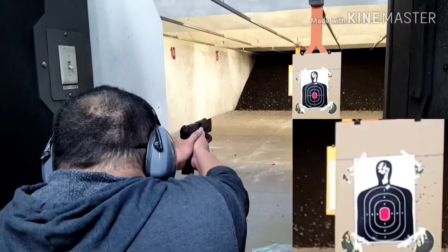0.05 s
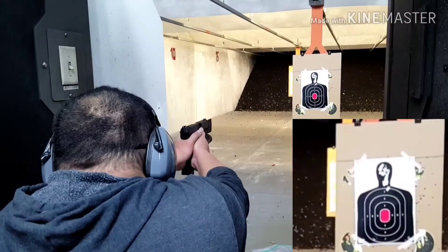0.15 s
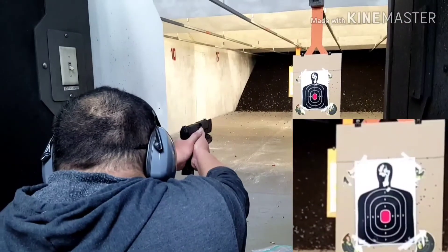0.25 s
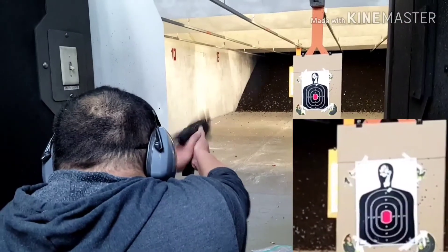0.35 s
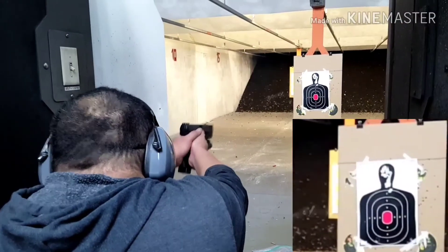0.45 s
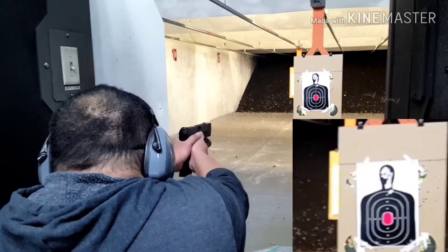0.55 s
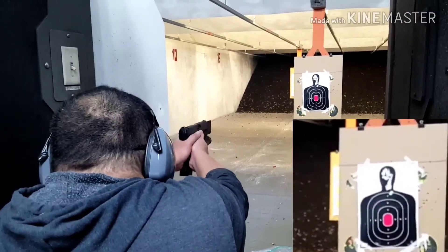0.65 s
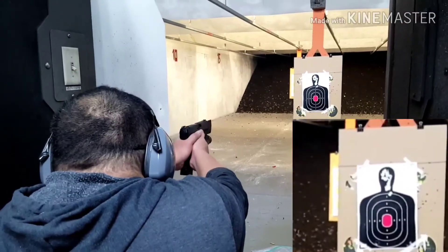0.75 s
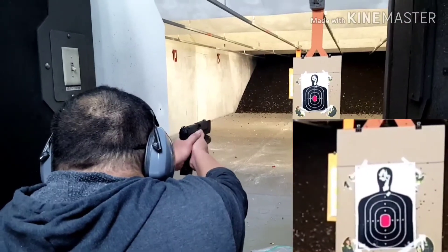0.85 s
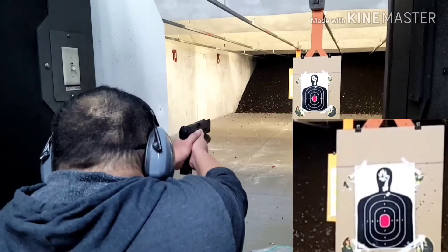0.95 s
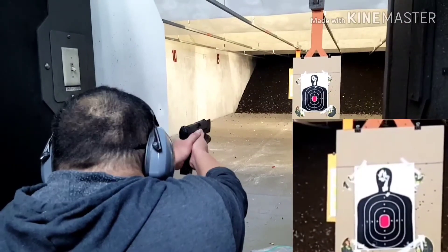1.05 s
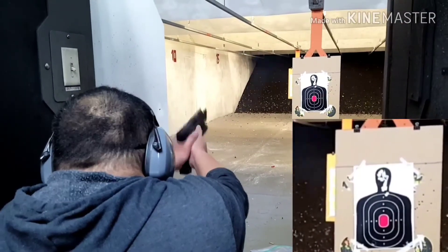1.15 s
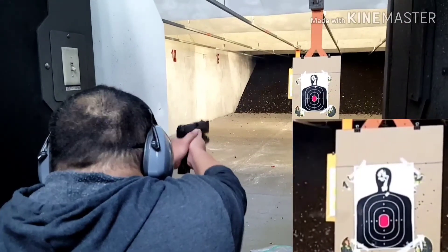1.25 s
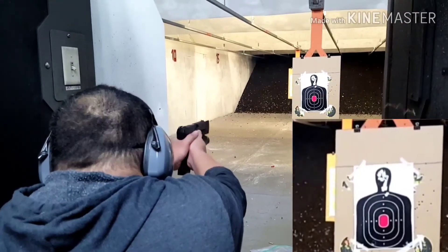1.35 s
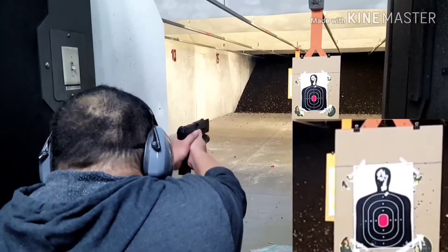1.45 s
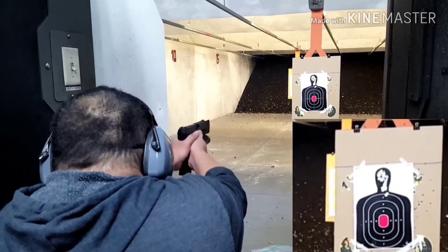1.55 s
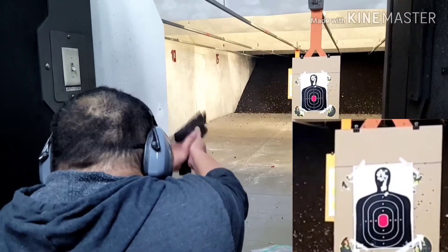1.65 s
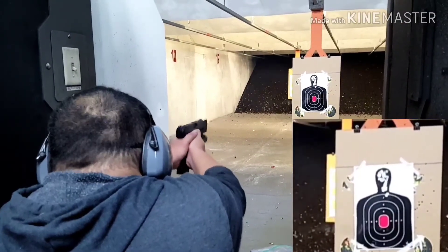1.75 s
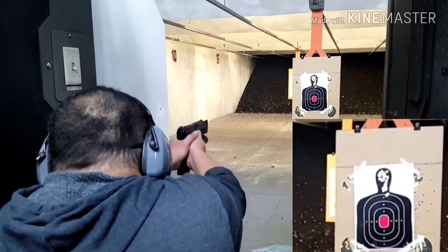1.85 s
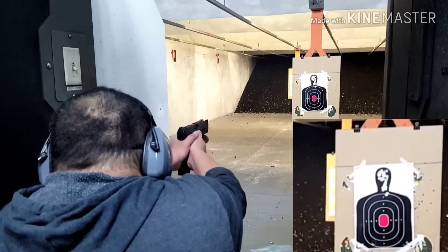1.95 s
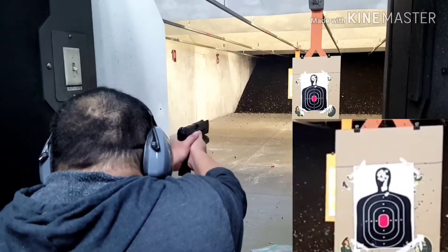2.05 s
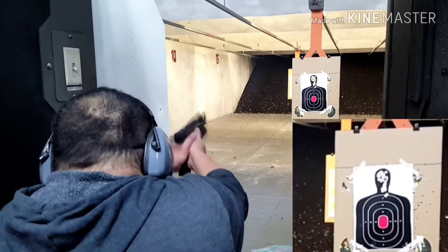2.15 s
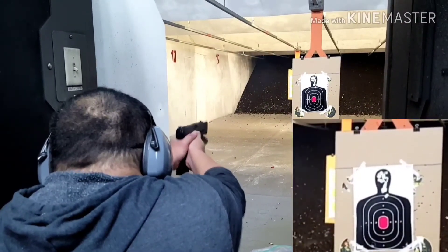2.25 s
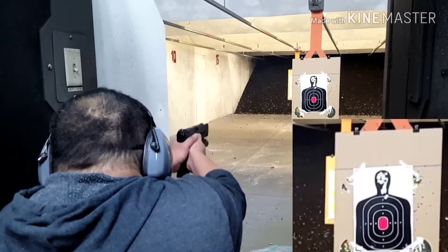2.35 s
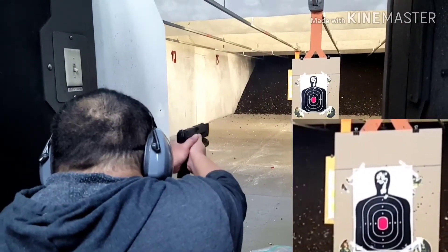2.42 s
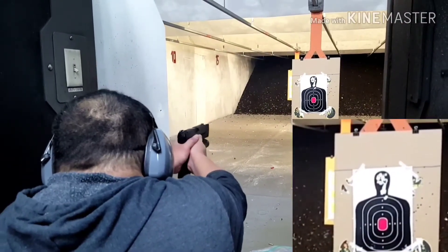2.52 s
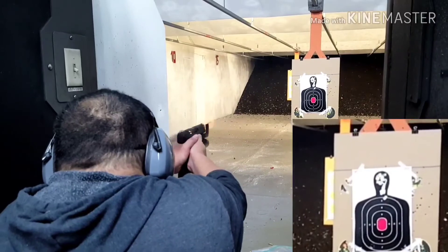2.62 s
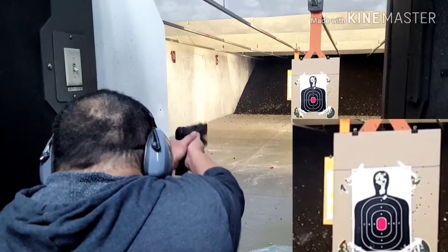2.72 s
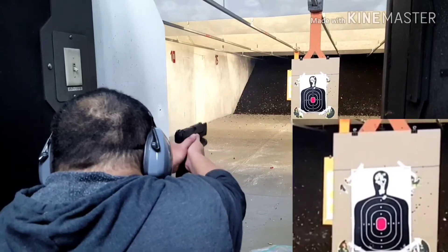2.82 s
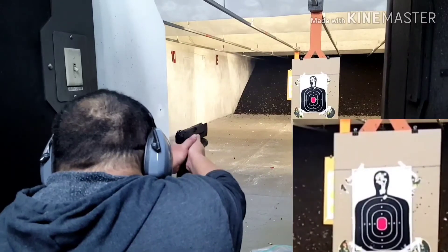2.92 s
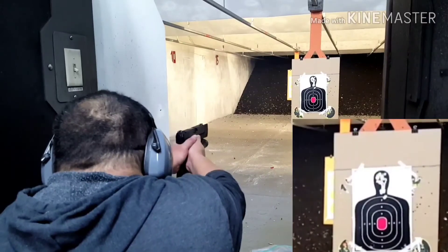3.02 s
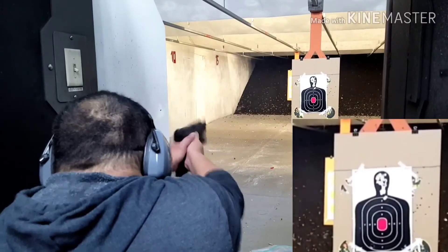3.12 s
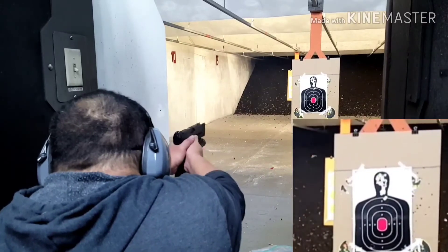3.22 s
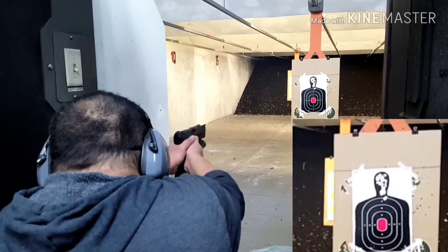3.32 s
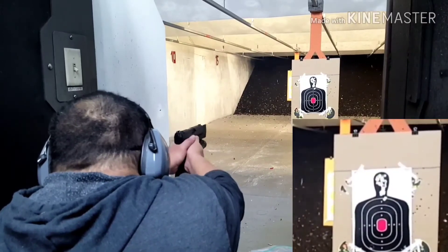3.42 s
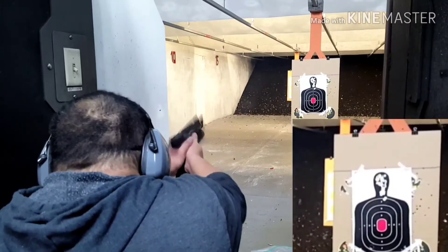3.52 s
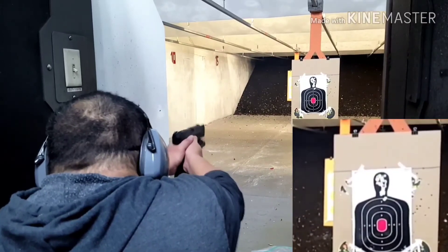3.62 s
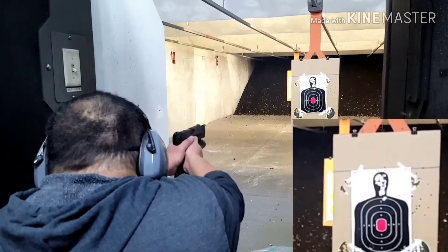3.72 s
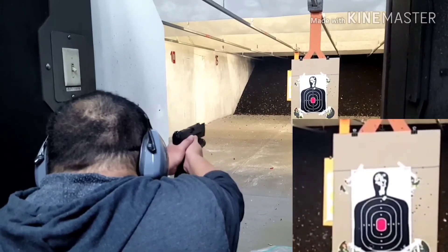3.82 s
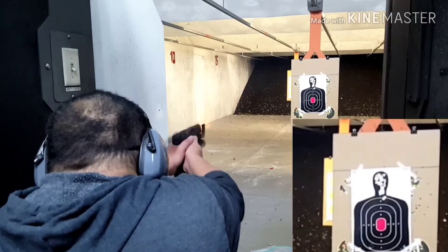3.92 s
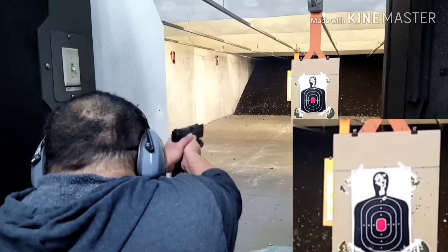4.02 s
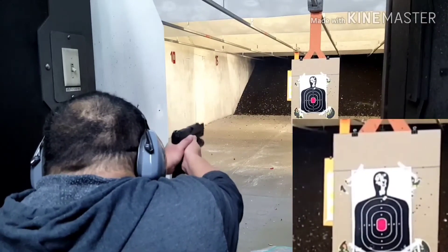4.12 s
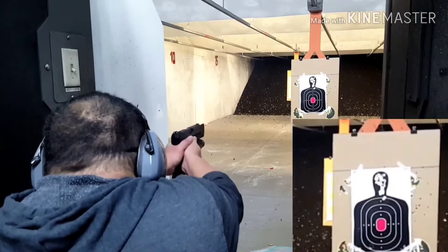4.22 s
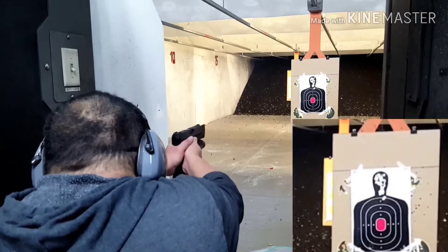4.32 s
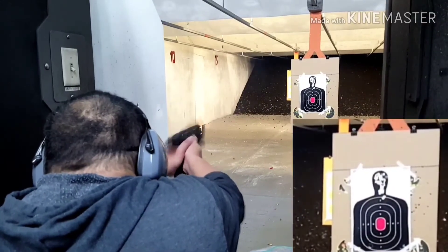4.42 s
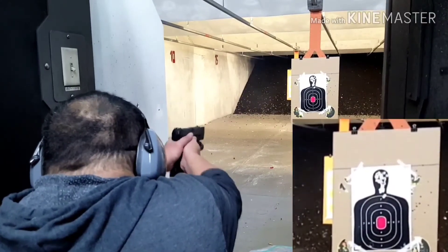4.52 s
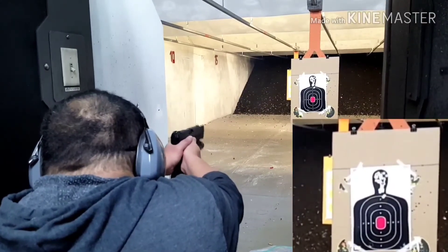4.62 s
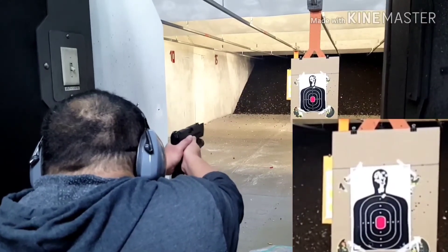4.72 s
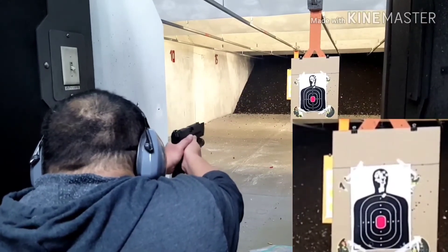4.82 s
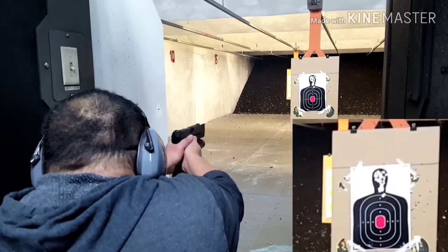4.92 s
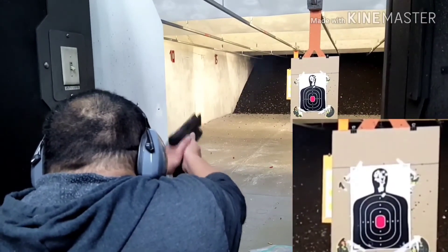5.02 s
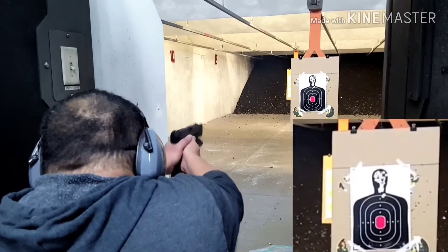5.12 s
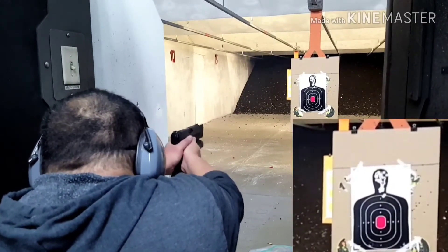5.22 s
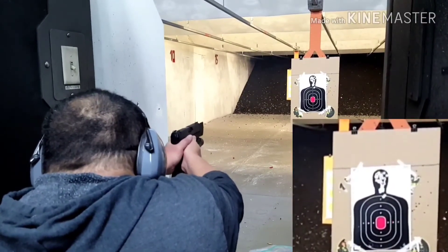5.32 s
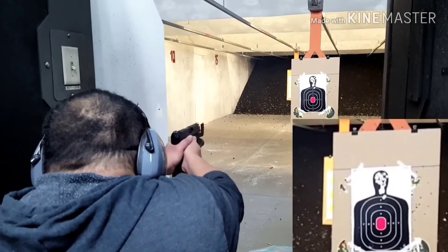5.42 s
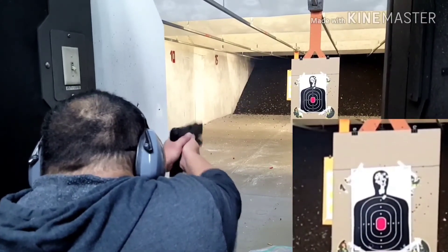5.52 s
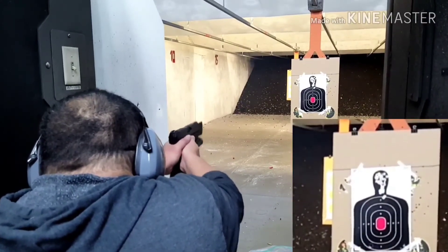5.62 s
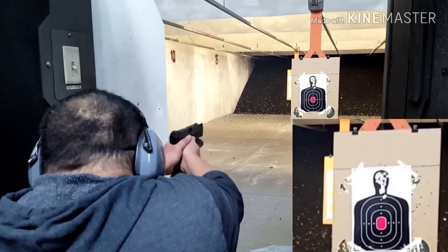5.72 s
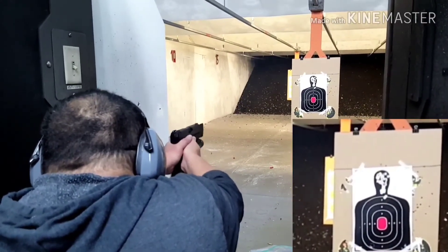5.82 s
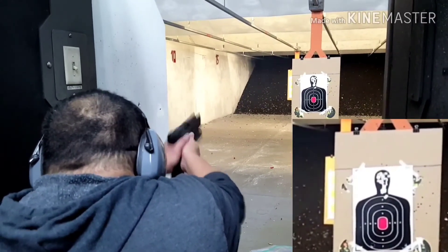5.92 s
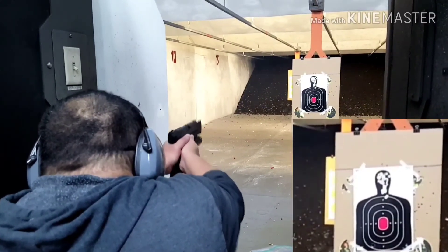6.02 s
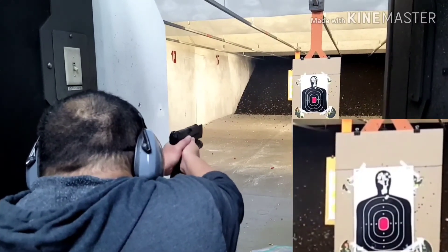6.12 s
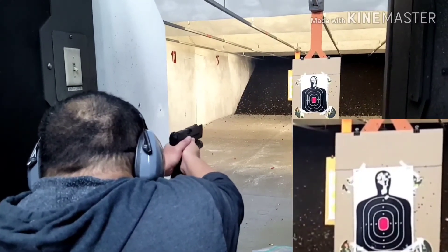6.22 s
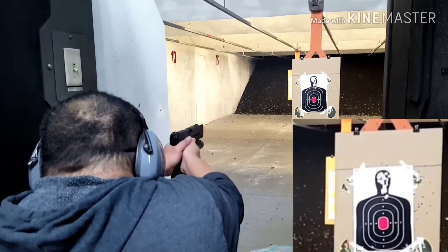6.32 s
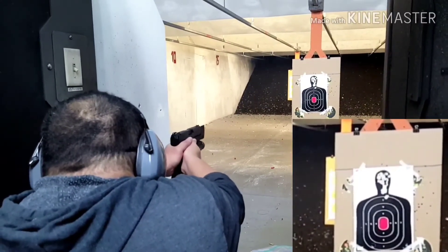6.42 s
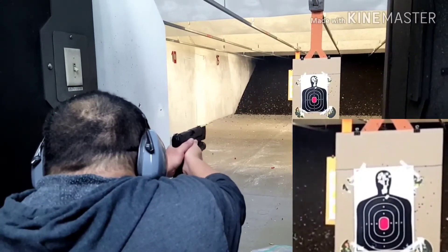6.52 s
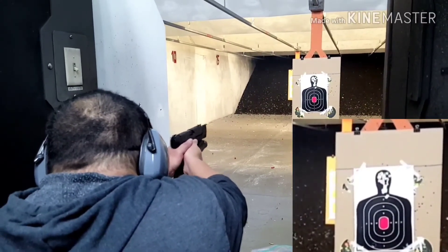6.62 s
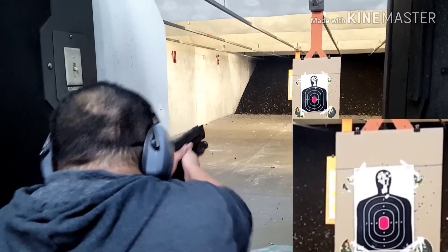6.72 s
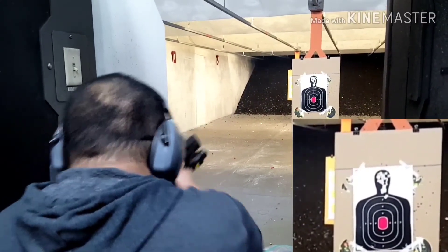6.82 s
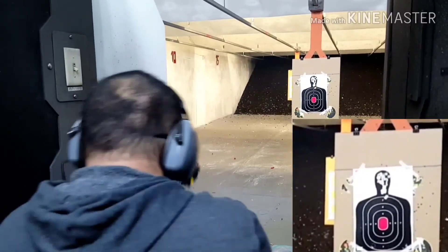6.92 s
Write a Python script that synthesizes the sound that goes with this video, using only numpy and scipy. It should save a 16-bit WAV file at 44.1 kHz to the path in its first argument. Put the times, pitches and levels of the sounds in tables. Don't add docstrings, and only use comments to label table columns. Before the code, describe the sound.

A pistol fires twelve evenly spaced, harshly distorted shots in an echoing concrete indoor range, with brass cases tinkling and steel clacks at the end.

```python
import sys
import numpy as np
from scipy import signal
from scipy.fft import rfft, irfft
from scipy.io import wavfile
from scipy.ndimage import uniform_filter1d

SR = 44100
rng = np.random.default_rng(int(sys.argv[2]) if len(sys.argv) > 2 else 0)


def output_pcm(signal):
    pcm = np.clip(np.atleast_2d(signal).T, -1, 1) * 32767
    wavfile.write(sys.argv[1], SR, np.round(pcm).astype(np.int16))


def gain_from_decibels(decibels):
    exponent = np.asarray(decibels, float) / 20
    return 10 ** exponent


N = 306936

# f/Hz, level/dB per Hz
VENT_SPECTRUM = [(25, -31.5), (60, -12), (110, -14), (200, -11.5), (400, -18), (650, -22), (900, -17.5),
                 (1400, -21.5), (2200, -25), (3500, -37), (5000, -45.5), (8000, -51), (11000, -53),
                 (15000, -75)]
# f/Hz, level/dB
FAN_TONES = [(107.7, -46), (242.2, -50), (425.3, -46), (495.3, -49.5), (888.2, -46), (3418, -59.5),
             (3585, -60), (4500, -62.5)]
# t/s, charge level/dB
SHOTS = [(.458, 1), (1.2378, 0.5), (1.7447, 1), (2.2489, 1), (2.75, 1), (3.177, 1), (3.6198, 1),
         (4.0497, 1), (4.5401, 0.5), (5.1115, 1), (5.566, 1), (6.0014, 1)]
# f/Hz, level/dB per Hz
HALL_SPECTRUM = [(35, -78), (60, -55), (120, -25), (200, -15.5), (320, -10.5), (430, -7.5), (560, -8),
                 (900, -12), (1400, -12.5), (2200, -17.5), (3500, -28), (5800, -36.5), (9500, -47.5),
                 (15500, -62)]
# f/Hz, T60/s
HALL_T60 = [(60, 0.65), (150, 1.5), (400, 0.85), (750, 0.84), (1400, 0.98), (2500, 0.97), (5000, 0.71),
            (12000, 0.46)]
# f/Hz, level/dB, T60/s
HALL_MODES = [(894.7, -27.5, 1.6), (563.7, -27.5, .9), (440, -26.5, .8), (386, -31, 0.93), (641, -34, 1.1),
              (1183, -34.5, 0.51), (1391, -29, .9), (1703, -31.5, .8), (2182, -37.5, 0.96)]
# f/Hz, correlation/0-1
LIKENESS = [(60, 0.99), (250, 1), (400, .88), (550, 1), (800, 0.6), (1200, .1), (9000, .05)]
# t after shot/s, peak level/dB, fade per slap/dB, f/Hz, length/s
FLUTTERS = [
    (0.099, -10.5, -1, 440, .012),
    (.175, -8, -2, 444.7, .013),
    (.245, -13, -5, 376, .014),
    (.32, -8.5, -9, 450, 0.0042),
    (.376, -17.5, -16, 405, 0.0061),
]
FLUTTER_SLAPS = (2, 3, 3, 2, 2)
# t/s, peak level/dB, ring level re click/dB
CASES = [(.711, -30.5, -20.5), (.971, -51, -16), (.984, -47, -24), (1.494, -26.5, -10.5),
         (1.984, -37.5, -30), (2.206, -48, -20), (2.5466, -32, -7.5), (2.639, -58, -5), (2.7217, -38, -2),
         (3.113, -39, -13), (3.445, -36, -16), (3.842, -43, 3), (3.929, -44, -7), (3.985, -46, -7),
         (4.29, -23.5, -15), (4.79, -37, -3), (5.464, -43, 2), (5.495, -47, 3), (5.5164, -50, -2),
         (5.85, -55, -14), (6.3, -58, -13.5), (6.446, -58, 1), (6.478, -61, -5.5), (6.4933, -29, -16),
         (6.57, -53, -10), (6.67, -67, 3), (6.72, -70.5, 5), (6.79, -57, -5), (6.836, -61, -5.5)]
# t/s, peak level/dB, f/Hz
CLACKS = [
    (5.83, -15, 2620),
    (6.267, -16, 2570),
    (6.7694, -57, 4000),
    (6.8187, -52, 3570),
    (6.8573, -58, 3500),
    (6.9072, -46, 3430),
]

BANDS_HZ = 40 * 2 ** np.arange(0, 8.7, 1 / 3)
HALL_SIZE = 2 ** 16
TAIL_AGE_S = 0.25
VENT_DB, VENT_DUCK_DB, RECOVER_S, RECOVER_DB_PER_S = -34.5, -11.5, 0.83, 39
HALL_DB, EARLY_DB, EARLY_S = -14, 16, 0.22
SAG_DB, LATE_DB, LATE_S = -1.66, 2, 0.52
BACKSTOP_S, BACKSTOP_DB, BACKSTOP_WIDTH_S = 0.306, 2, 0.023
FLUTTER_S = 0.022
THUD_S, THUD_DB, THUD_HZ, THUD_LENGTH_S = 0.375, -36, 159.4, 0.022
LANDS_S, LANDS_PAN_DB, ROLLS_PAN_DB = 0.29, -4.5, 3
CASE_HZ, CASE_SPREAD_HZ, CASE_T60_S, CASE_WOBBLE = 9920, 35, 0.31, 0.0079
LAG_S = 0.00022
SATURATION_DB = -4.5
WRAP_START, WRAP_SAG, WRAP_BEND, WRAP_ENDS_S = 1.033, 0.2, 3.5, 0.205
WRAP_PAUSE_S, WRAP_PAUSE_WIDTH_S, WRAP_PAUSE = 0.178, 0.006, 0.091
FIRST_DB, DUCK_DB, DUCK_S, PUSH_DB = 5, -5.5, 0.089, 2.01
AHEAD_DB, AHEAD_S = -1.5, 0.01


def on_log(hz, table):
    table = np.array(table)
    return np.interp(np.log(hz), np.log(table[:, 0]), table[:, 1])


def add(out, x, s):
    i = int(s * SR)
    out[:, i:i + x.shape[1]] += x[:, :out.shape[1] - i]


def bump(t, s, width):
    return np.exp(-((t - s) / width) ** 2)


def rms_db(x, db, part=slice(None)):
    return x * gain_from_decibels(db) / np.sqrt(np.mean(x[:, part] ** 2))


def since_shot(t):
    starts = np.array(SHOTS)[:, 0]
    latest = np.maximum(np.searchsorted(starts, t) - 1, 0)
    return np.where(t < starts[0], 1, t - starts[latest])


def pair(size, hz, width):
    f = np.arange(size // 2 + 1) * SR / size
    low = int(hz * np.exp(-3 * width) * size / SR)
    high = int(hz * np.exp(3 * width) * size / SR) + 2
    near = slice(low, high)
    phase = 2 * np.pi * rng.random((2, len(f)))[:, near]
    fall = (np.log(f[near] / hz + 1e-9) / width) ** 2
    spectrum = np.zeros((2, len(f)), complex)
    spectrum[:, near] = np.exp(1j * phase - fall)
    mid, side = irfft(spectrum, size)
    like = np.clip(on_log(hz, LIKENESS), 0, 1)
    return np.sqrt(1 + like) * mid + np.sqrt(1 - like) * side * np.array([[1], [-1]])


def ventilation():
    air = sum(pair(HALL_SIZE, hz, 0.22) * gain_from_decibels(on_log(hz, VENT_SPECTRUM)) for hz in BANDS_HZ)
    duct = rms_db(air, 0)
    for hz, db in FAN_TONES:
        duct = duct + rms_db(pair(HALL_SIZE, hz, min(55 / hz, 0.025)), db + 36.0)
    duct = np.take(duct, np.arange(N), axis=1, mode="wrap")
    shooting = np.arange(N) > SHOTS[0][0] * SR
    hum = signal.filtfilt(*signal.butter(N=2, Wn=600, fs=SR), duct)
    duct = duct - 0.55 * shooting * hum
    t = np.arange(N) / SR
    recovery_db = RECOVER_DB_PER_S * np.maximum(since_shot(t) - RECOVER_S, 0)
    duck_db = np.minimum(VENT_DUCK_DB + recovery_db, 0) * (t > SHOTS[0][0])
    return duct * gain_from_decibels(VENT_DB + duck_db)


def swell_db(t):
    early = EARLY_DB * np.clip(1 - t / EARLY_S, 0, 1)
    backstop = BACKSTOP_DB * bump(t, BACKSTOP_S, BACKSTOP_WIDTH_S)
    late = LATE_DB / (1 + np.exp((LATE_S - t) / 0.013))
    return early + SAG_DB + backstop + late


def hall(size):
    t = np.arange(size) / SR

    def build(hz):
        return 1 - np.exp(-(t + 0.0052) * hz / 45)

    response = np.zeros((2, size))
    for hz in BANDS_HZ:
        decay_db = -60 * (t - TAIL_AGE_S) / on_log(hz, HALL_T60)
        response += pair(size, hz, 0.17) * build(hz) * gain_from_decibels(on_log(hz, HALL_SPECTRUM) + decay_db)
    response = rms_db(response, HALL_DB, slice(int(0.21 * SR), int(0.29 * SR)))
    for hz, db, t60 in HALL_MODES:
        mode = rms_db(pair(size, hz, 0.06), db)
        response = response + mode * build(hz / 3) * gain_from_decibels(-60 * (t - TAIL_AGE_S) / t60)
    fade_out = np.clip((size / SR - t - 0.06) / 0.3, 0, 1)
    return response * gain_from_decibels(swell_db(t)) * fade_out


def blast():
    repeating, spare = hall(HALL_SIZE), hall(HALL_SIZE)
    t = np.arange(HALL_SIZE) / SR

    def slap(s, db, hz, length):
        tone = np.sin(2 * np.pi * (hz * (t - s) + rng.random()))
        return gain_from_decibels(db) * bump(t, s, length) * tone

    for (s, db, fade_db, hz, length), count in zip(FLUTTERS, FLUTTER_SLAPS):
        for k in range(count):
            repeating = repeating + slap(s + k * FLUTTER_S, db + k * fade_db, hz, length)
    return repeating + slap(THUD_S, THUD_DB, THUD_HZ, THUD_LENGTH_S), spare


def pistol():
    out = np.zeros((2, N))
    repeating, spare = (rfft(x) for x in blast())
    f = np.arange(HALL_SIZE // 2 + 1) * SR / HALL_SIZE
    change = 1.2 * f / (f + 1600)
    for (s, db), turn in zip(SHOTS, rng.uniform(-1, 1, len(SHOTS))):
        mix = np.cos(change * turn) * repeating + np.sin(change * turn) * spare
        add(out, gain_from_decibels(db) * irfft(mix, HALL_SIZE)[:, :-SR // 20], s)
    return out


def cases():
    out, t = np.zeros((2, N)), np.arange(SR // 2) / SR
    treble = signal.butter(N=2, Wn=[5000, 15000], btype="band", fs=SR, output="sos")
    for (s, db, ring_db), off in zip(CASES, rng.standard_normal((len(CASES), 2))):
        hz = CASE_HZ + CASE_SPREAD_HZ * off[0]
        side_db = LANDS_PAN_DB if since_shot(s) < LANDS_S else ROLLS_PAN_DB
        pan_db = side_db + 1.5 * off[1]
        noise = signal.sosfilt(treble, rng.standard_normal((2, len(t))))
        click_decay = gain_from_decibels(-5.5 - 60 * t / 0.066) + gain_from_decibels(-21.5 - 60 * t / 0.16)
        click = noise * click_decay * gain_from_decibels(7.5 - 0.78 * (ring_db + 11.5))
        tone = 0.53 * np.sin(2 * np.pi * hz * t) + rms_db(pair(len(t), hz, CASE_WOBBLE), -1)
        ring = tone * gain_from_decibels(ring_db + 0.5 - 60 * t / CASE_T60_S)
        add(out, (click + ring) * gain_from_decibels(db + np.array([[pan_db], [-pan_db]]) / 2), s)
    return out


def clacks():
    out, t = np.zeros((2, N)), np.arange(SR // 10) / SR
    for s, db, hz in CLACKS:
        knock = rms_db(pair(len(t), hz, 0.44), db + 0.5)
        add(out, knock * gain_from_decibels(-60 * t / 0.04), s)
    return out


def scene():
    left, right = ventilation() + pistol() + cases() + clacks()
    return np.array([np.roll(left, int(LAG_S * SR)), right])


def smear(x, hz, width_hz):
    pole = np.exp((-np.pi * width_hz + 2j * np.pi * hz) / SR)
    a = np.poly([pole, np.conj(pole)]).real
    return signal.lfilter(a[::-1], a, x)


def overload(dry, age):
    over = np.clip((WRAP_ENDS_S - age) / 0.012 + 1, 0, 1)
    pause = bump(age, WRAP_PAUSE_S, WRAP_PAUSE_WIDTH_S)
    sag = WRAP_SAG * np.minimum(age / WRAP_ENDS_S, 1) ** WRAP_BEND
    wrap = WRAP_START - sag + WRAP_PAUSE * pause + (1 - over)
    held = dry / gain_from_decibels(SATURATION_DB)
    held = held / (1 + np.abs(held) ** 3.485) ** (1 / 3.498)
    chatter = uniform_filter1d(rng.standard_normal(dry.shape), size=5)
    held = held + 0.08 * held ** 4 * chatter
    wrapped = held - 2 * wrap * np.sign(held) * (np.abs(held) > wrap)
    return wrapped * gain_from_decibels(SATURATION_DB), over - pause


def gain_control(t, age, overloaded):
    starts = np.array(SHOTS)[:, 0]
    ahead = sum(bump(t, s - AHEAD_S, AHEAD_S) * (t < s) for s in starts)
    first = np.exp(-np.abs(t - starts[0]) / 0.026) * (t > starts[0])
    return DUCK_DB * bump(age, 0, DUCK_S) + PUSH_DB * overloaded + AHEAD_DB * ahead + FIRST_DB * first


def top_cut(x):
    return signal.sosfilt(signal.butter(12, 16240, fs=SR, output="sos"), x)


def record(dry):
    t = np.arange(N) / SR
    age = since_shot(t)
    out, overloaded = overload(dry, age)
    out = out * gain_from_decibels(gain_control(t, age, overloaded))
    out = smear(smear(out, hz=700, width_hz=1200), hz=2500, width_hz=5200)
    out = 0.66 * out + 0.4 * signal.lfilter(*signal.butter(N=1, Wn=3000, fs=SR), out)
    bass = signal.filtfilt(*signal.butter(N=1, Wn=300, fs=SR), out)
    out = out - 0.46 * bump(age, 0, 0.071) * bass
    out = signal.lfilter(*signal.butter(N=1, Wn=35, btype="high", fs=SR), out)
    out = signal.sosfilt(signal.ellip(N=8, rp=0.2, rs=40, Wn=15700, fs=SR, output="sos"), out)
    return top_cut(np.clip(out, -1, 1))


dry = scene()
out = record(dry)
output_pcm(out)
```